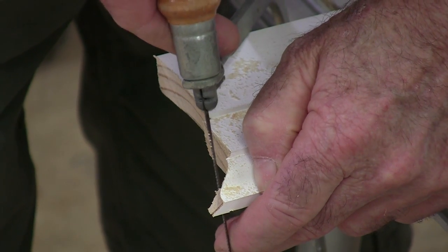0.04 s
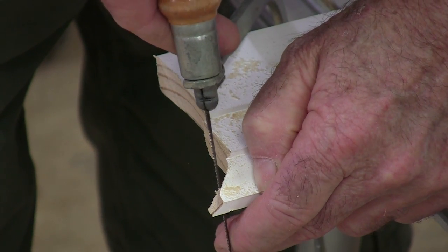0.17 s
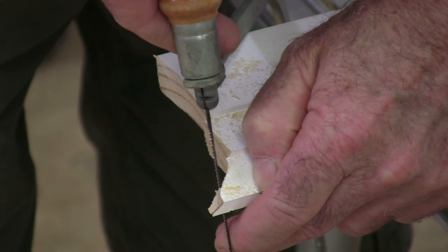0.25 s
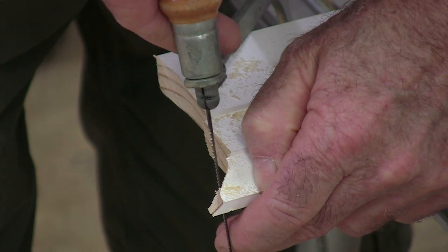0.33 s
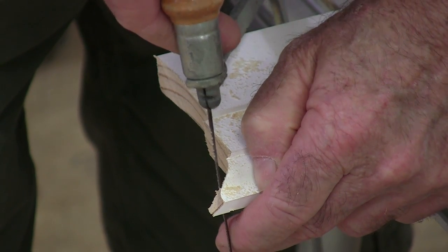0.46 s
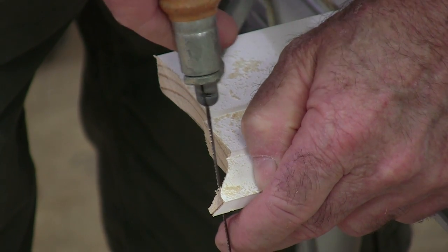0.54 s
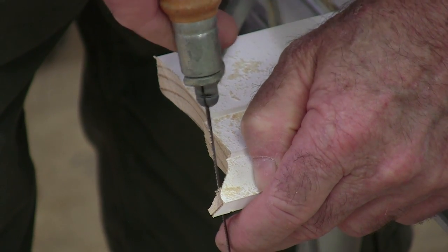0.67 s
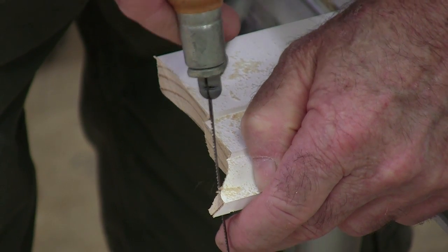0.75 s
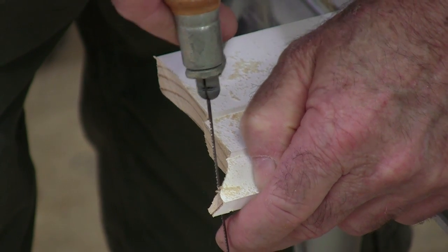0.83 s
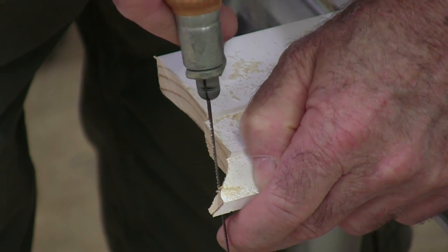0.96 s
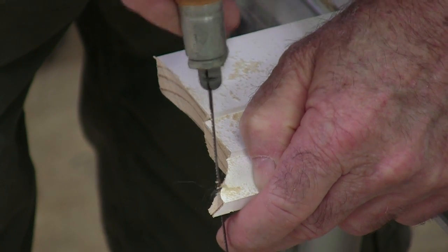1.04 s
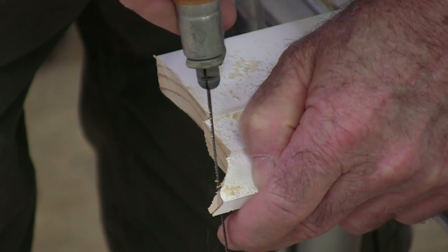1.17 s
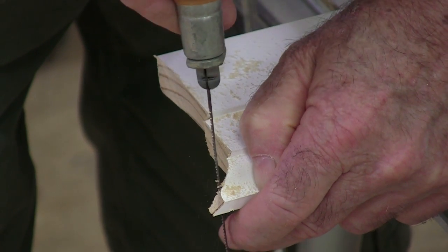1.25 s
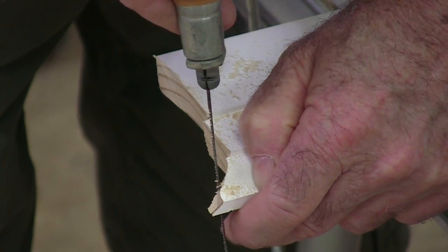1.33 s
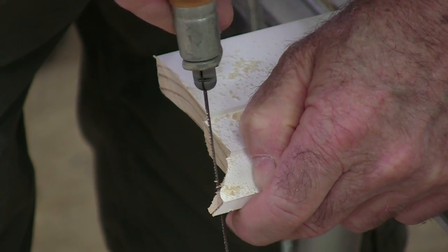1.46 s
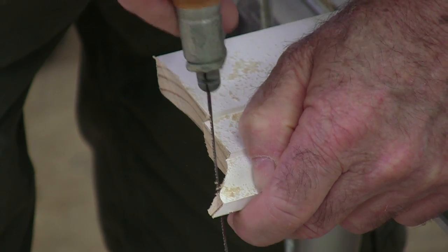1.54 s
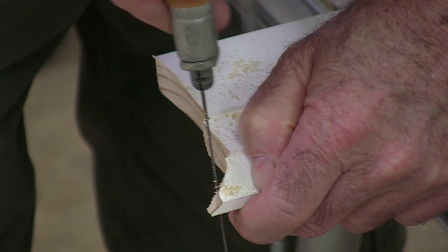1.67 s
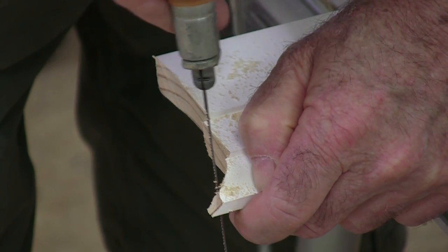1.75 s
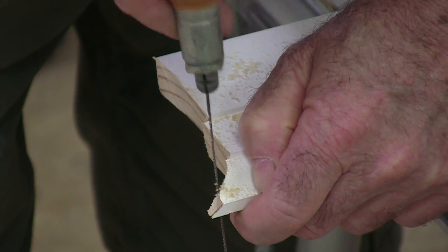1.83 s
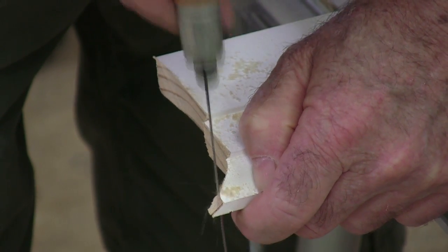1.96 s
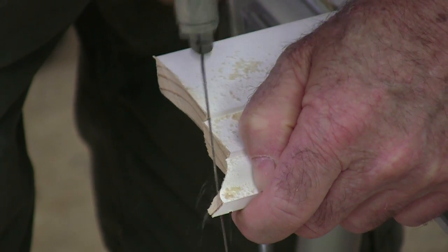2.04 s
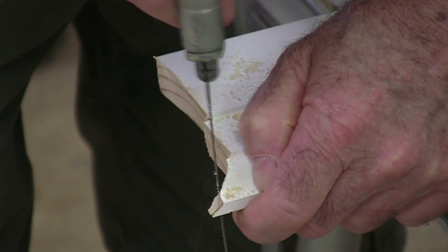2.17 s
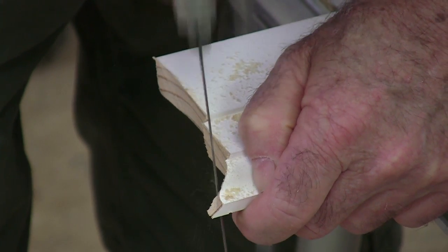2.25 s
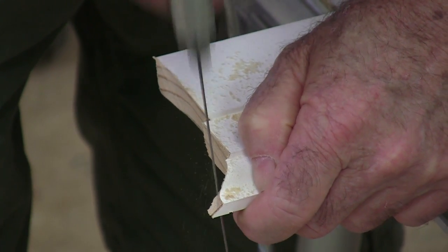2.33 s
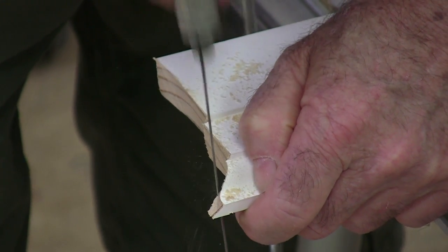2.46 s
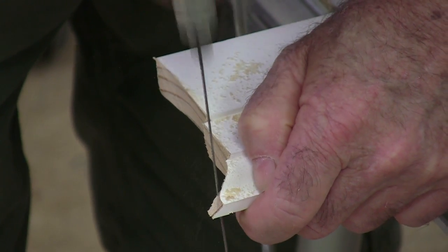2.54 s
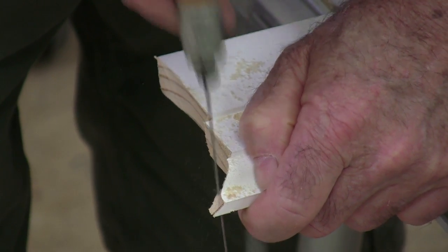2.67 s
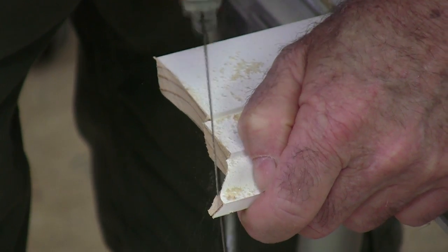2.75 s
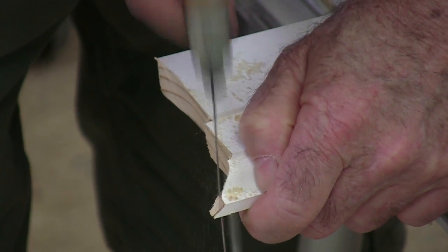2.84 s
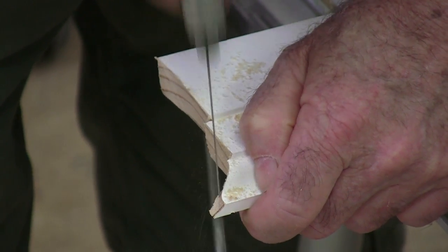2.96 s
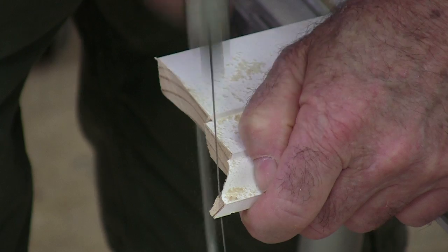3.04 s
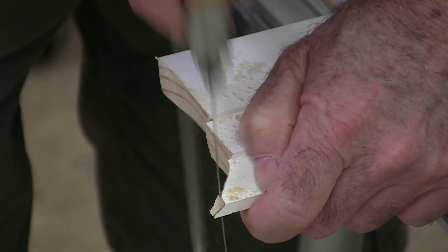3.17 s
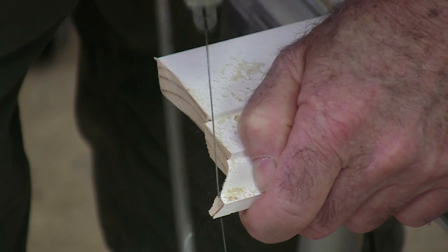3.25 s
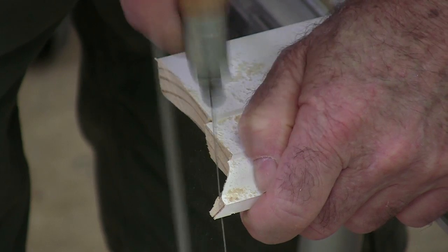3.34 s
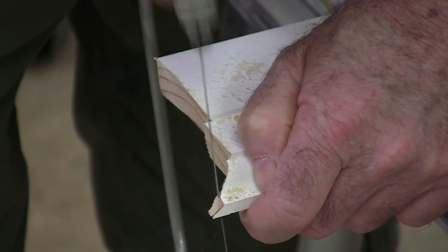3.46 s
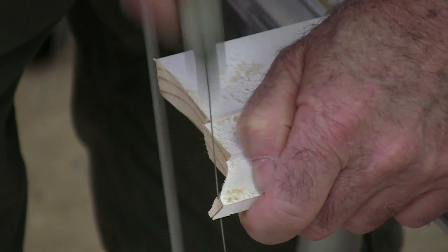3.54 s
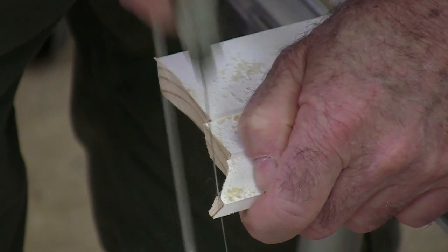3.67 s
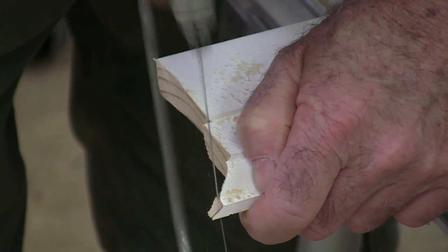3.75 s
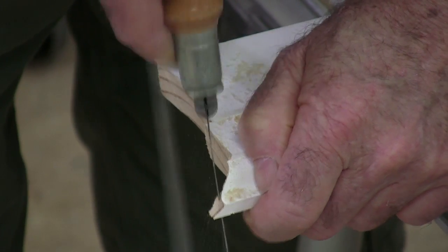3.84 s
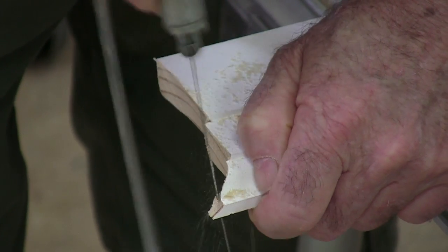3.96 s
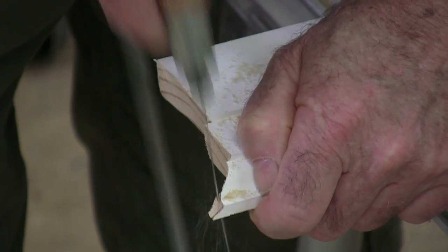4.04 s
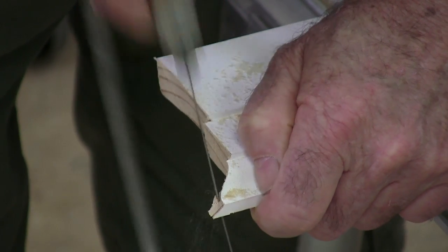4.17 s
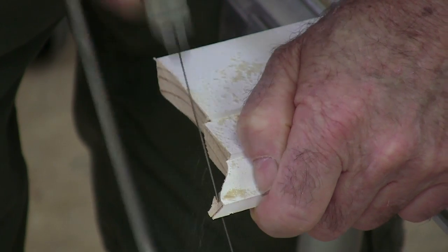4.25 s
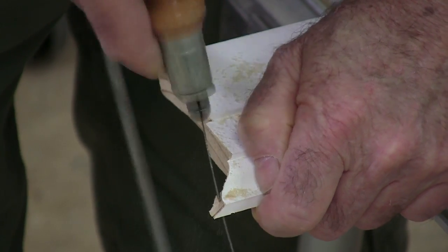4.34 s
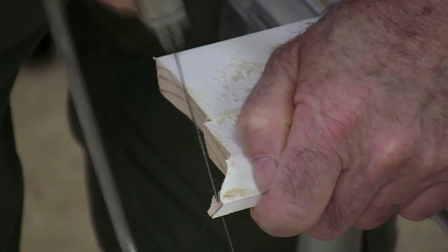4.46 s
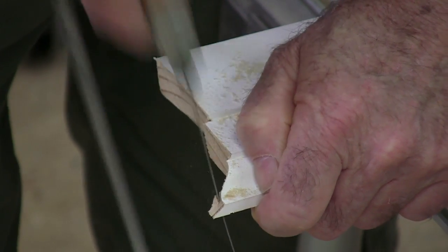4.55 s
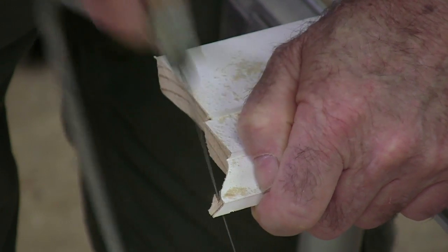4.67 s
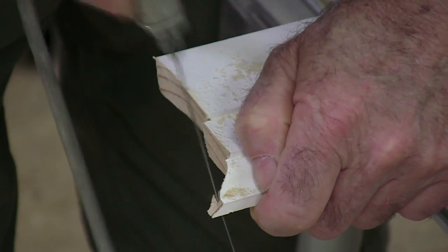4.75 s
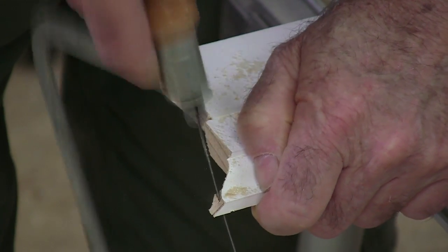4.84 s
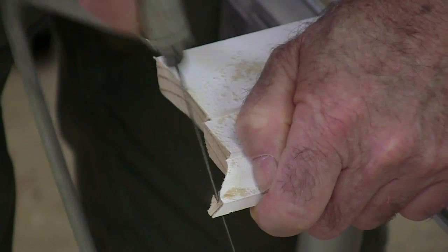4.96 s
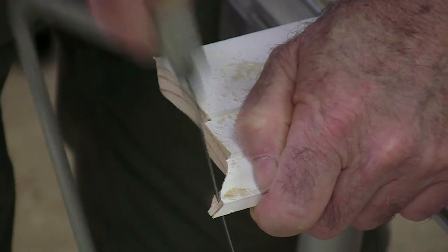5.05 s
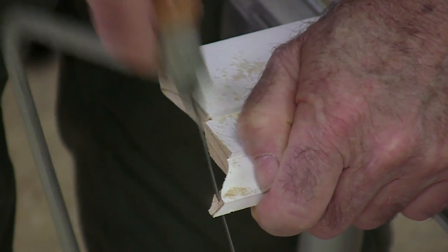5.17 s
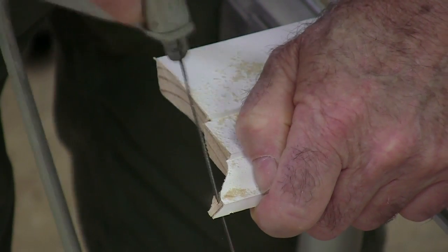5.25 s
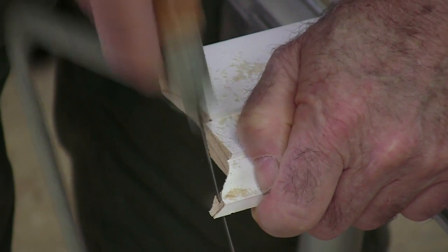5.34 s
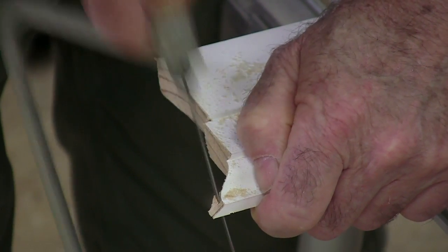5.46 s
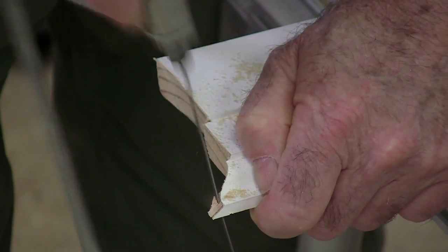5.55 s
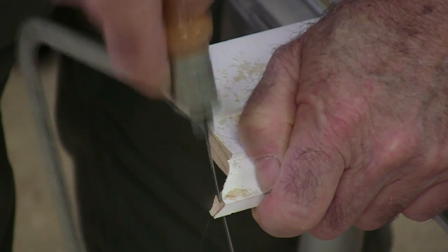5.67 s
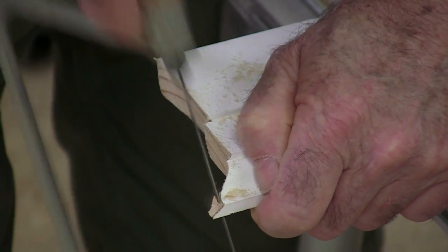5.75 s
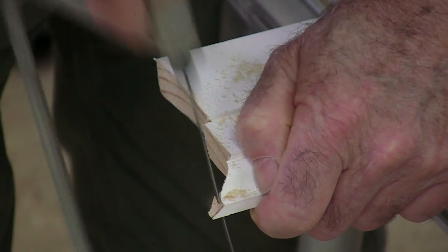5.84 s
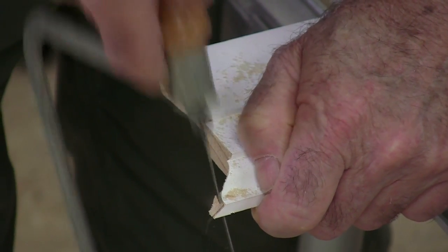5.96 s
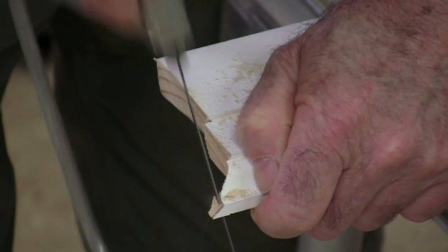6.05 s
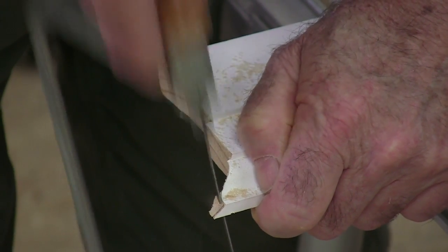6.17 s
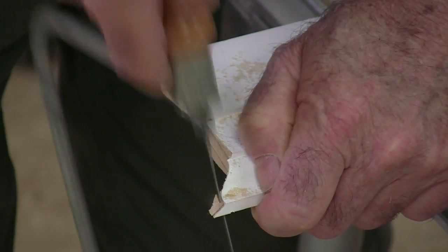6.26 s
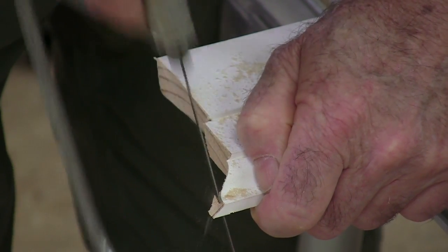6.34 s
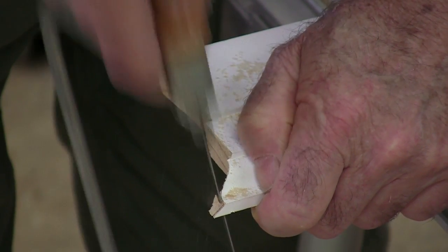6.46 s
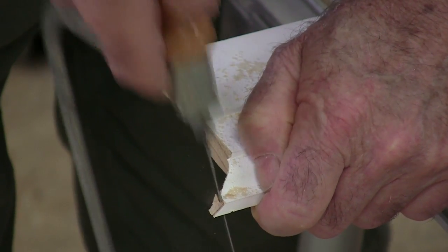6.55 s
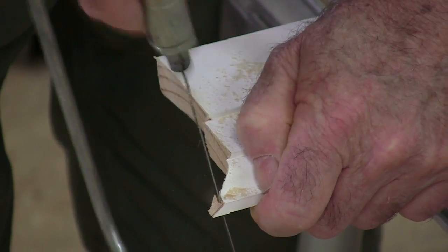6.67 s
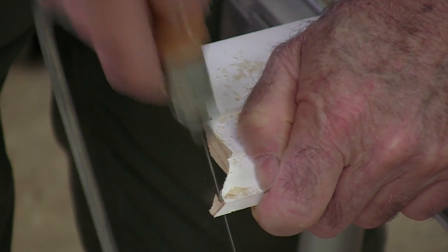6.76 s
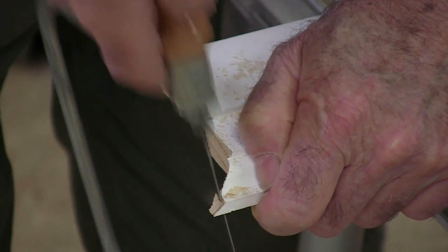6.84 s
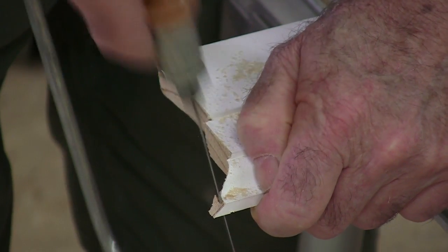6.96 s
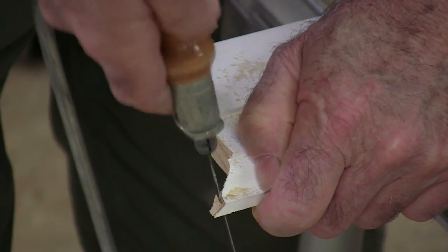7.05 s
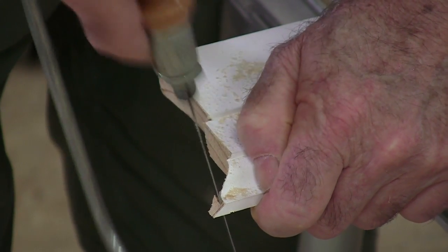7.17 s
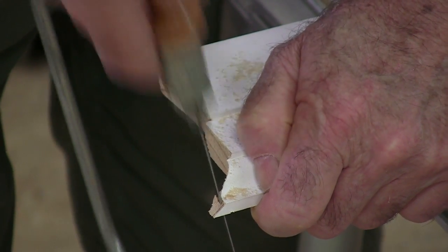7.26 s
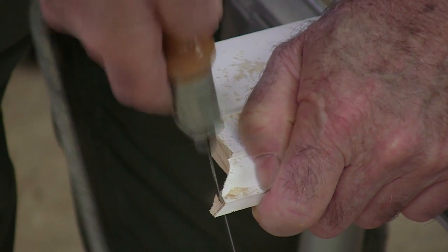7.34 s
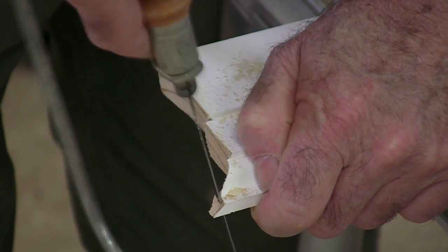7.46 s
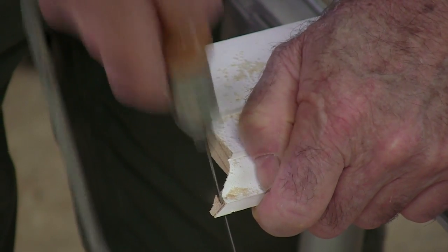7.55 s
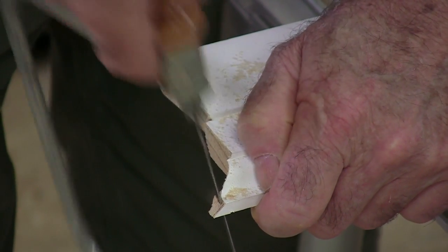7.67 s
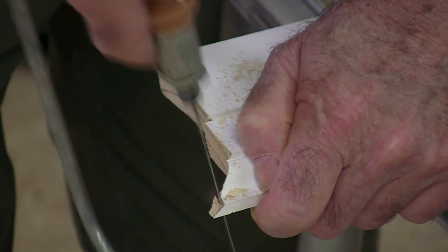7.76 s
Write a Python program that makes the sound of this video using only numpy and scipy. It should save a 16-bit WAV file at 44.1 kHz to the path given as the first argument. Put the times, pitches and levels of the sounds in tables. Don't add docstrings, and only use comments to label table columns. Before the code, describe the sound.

After a few light wooden taps, a hand coping saw rasps rapidly back and forth through a board, close up in a small workshop.

```python
import sys
import numpy as np
from scipy import signal
from scipy.fft import rfft, irfft, next_fast_len
from scipy.io import wavfile
from scipy.ndimage import uniform_filter1d, map_coordinates

SR = 44100
rng = np.random.default_rng(int(sys.argv[2]) if len(sys.argv) > 2 else 0)


def nominal_scale(level):
    x = np.asarray(level, float) / 20
    return 10 ** x


def output_pcm(signal):
    pcm = np.clip(np.atleast_2d(signal).T, -1, 1) * 32767
    wavfile.write(sys.argv[1], SR, np.round(pcm).astype(np.int16))


N = 344112

# time in seconds, peak in dB, thud of the bench in dB.
TAPS = [(0.568, -25, -14), (0.586, -30, -8), (0.593, -31, -8), (0.603, -31, -12), (0.771, -33, -6),
        (0.771, -23, -6), (0.776, -24, -10), (0.789, -16, -21), (0.793, -16, -20), (0.797, -19, -6),
        (0.81, -47, 4), (0.825, -45, 6), (1.084, -5.5, -11), (1.1, -11, -10), (1.115, -10.5, -13),
        (1.126, -34.5, 14)]
# frequency in Hz, width in Hz, level in dB in the shallow cut, level in dB in the deep cut.
BOARD = [(164, 68, -2.5, -10), (208, 59.4, -0.5, -8.5), (310.8, 21, -0.5, -1), (374, 29, -2.5, -4.5),
         (526, 60, -3, -4), (639.9, 10, -17, -25), (643.3, 27, -15, -26), (804, 42, -3, -2.5),
         (925, 54, -2, -3), (1085, 66, -3, -2), (1191, 71, -2, 2), (1243, 73, -4, 0.5),
         (1332, 76.8, -0.5, 2), (1426, 58, 2, -4.5), (1500, 69, -3.5, -12.5), (1670, 23, -6.5, -12),
         (1875, 48, -12, -9.5), (2176, 125, -19.5, -16.5), (2370, 94, -24, -24.5),
         (2756, 350, -35.5, -28.5), (3275, 135, -26, -21), (3550, 300, -29.5, -33.5),
         (4380, 290, -29, -25.5), (4740, 410, -34, -34)]
BENCH_HZ, FRAME_HZ = 640, 2600
# frequency in Hz, width in Hz, level in dB.
LEGS = [(134.6, 18, -1.5), (243.04, 30.5, -4.5)]
# time in seconds, depth 0-1, teeth per second at full speed, brightness in dB.
CUT = [
    (0, 0.2, 360, -3),
    (2, 0.1, 387, 0),
    (2.7, 0, 506, 1.5),
    (3.5, 0.3, 529, 1.5),
    (4.3, 0.28, 538, 1.5),
    (5, 0.66, 450, 4.5),
    (5.7, 0.85, 520, -2),
    (6.4, 0.97, 590, 0.5),
    (7.1, 0.95, 492, 1.5),
    (7.8, 1, 503, 3),
]
# start in seconds, bite in dB, bite at entry in dB, push into the bench in dB.
PULLS = [(2.019, -24.5, -29.5, 1.5), (2.28, -23, -26, -2.5), (2.49, -25, -23.5, -1),
         (2.733, -18, -24.5, -1), (2.978, -18.5, -23.5, -4), (3.218, -20, -25, -8),
         (3.458, -20.5, -23.5, -7), (3.698, -19.5, -26, -2), (3.952, -18.5, -17, 0.5),
         (4.198, -21, -20.5, -6), (4.454, -22, -27, -9.5), (4.7, -25.5, -24.5, -8), (4.955, -28, -26, -7),
         (5.214, -29, -27, -7), (5.479, -21, -24, -6), (5.751, -21, -20.5, -4), (6.026, -20, -20, -5.5),
         (6.318, -20, -18.5, -3.5), (6.603, -24, -21.5, -6.5), (6.888, -27.5, -25, -4.5),
         (7.159, -29.5, -23.5, -2), (7.426, -26.5, -22, -3.5), (7.691, -28.5, -23, -4)]
# start in seconds, bite in dB, bite at entry in dB, push into the bench in dB.
RETURNS = [(2.124, -31.5, -35, 1.5), (2.382, -24.5, -28.5, -7.5), (2.623, -22.5, -23.5, -2.5),
           (2.868, -19, -23, -6.5), (3.105, -20, -24.5, -6.5), (3.357, -19.5, -27, -10),
           (3.59, -19.5, -26.5, -6.5), (3.839, -20, -25, -5.5), (4.087, -21.5, -26.5, -1),
           (4.33, -23.5, -28, -5.5), (4.583, -24.5, -30.5, -8.5), (4.837, -26, -31.5, -7),
           (5.092, -26.5, -31.5, -6), (5.362, -25, -28, -5.5), (5.636, -21.5, -22.5, -8),
           (5.907, -23, -24.5, -5), (6.193, -20.5, -21.5, -9.5), (6.472, -22, -24, -6),
           (6.771, -25.5, -26.5, -2.5), (7.037, -24, -26, -4), (7.305, -27, -28, -1),
           (7.574, -25, -25, -1.5)]


def unit(x):
    return x / np.sqrt(np.mean(x ** 2) + 1e-20)


def along(points, hz):
    f, v = np.transpose(points)
    return np.interp(np.log(hz + 1), np.log(f + 1), v)


def curves(rows):
    s, *cols = np.transpose(rows)
    return [np.interp(np.arange(N) / SR, s, c) for c in cols]


def wobble(rate):
    knots = rng.standard_normal(int(N * rate / SR) + 4)
    return map_coordinates(knots, [np.arange(N) * rate / SR])


def filtered(x, response):
    m = next_fast_len(N + SR // 4, real=True)
    return irfft(rfft(x, m) * response(np.fft.rfftfreq(m, 1 / SR)), m)[..., :N]


def soft(x, corner_hz, order=1):
    return filtered(x, lambda hz: (1 + 1.2j * hz / corner_hz - (hz / corner_hz) ** 2) ** -order)


def ring(force, modes):
    def response(f):
        total = 0
        for k, (hz, width, db) in enumerate(modes):
            total = total + (-1) ** k * nominal_scale(db) * 1j * f * width / (hz * hz - f * f + 1j * f * width)
        return total
    return filtered(force, response)


def board(force, depth, low_hz, high_hz):
    drift = .007
    modes = [m for m in BOARD if low_hz < m[0] < high_hz]
    shallow = ring(force, [(hz * (1 + drift), w, db) for hz, w, db, _ in modes])
    deep = ring(force, [(hz * (1 - drift), w, db) for hz, w, _, db in modes])
    return (1 - depth) * shallow + depth * deep


def blows(times, sizes):
    return np.bincount(np.round(np.asarray(times) * SR).astype(int), sizes, N)[:N]


def stroke_plan():
    pull_turn_s, return_turn_s, last_turn_s = .033, .028, 7.83
    longest_pull_s, longest_return_s = .14, .1
    pull_exit_db, return_exit_db = -5, -5.5
    grip_db = 4
    # start in seconds, length in seconds, bite in dB, bite at entry in dB, push into the bench in dB.
    rubs = [
        (0.545, 0.062, -44, -50, 2),
        (0.768, 0.033, -31, -33, 4),
        (1.953, 0.049, -38.5, -47.5, -3),
    ]
    plan = [(s, length, entry, db, db + return_exit_db, push) for s, length, db, entry, push in rubs]
    for rows, others, turn_s, longest_s, exit_db in [
            (PULLS, RETURNS, pull_turn_s, longest_pull_s, pull_exit_db),
            (RETURNS, PULLS, return_turn_s, longest_return_s, return_exit_db)]:
        for s, db, entry, push in rows:
            following = min([row[0] for row in others if row[0] > s] + [last_turn_s])
            length = min(following - s - turn_s, longest_s)
            grip = grip_db * np.interp(s, *np.transpose(CUT)[:2])
            plan.append((s, length, entry, db, db + exit_db + grip, push))
    return plan


def strokes(rise_s, fall_s, drag_db):
    t = np.arange(N) / SR
    speed, bite, push = np.zeros(N), np.zeros(N), np.zeros(N)
    for s, length, entry_db, middle_db, exit_db, push_db in stroke_plan():
        span = slice(round((s - .03) * SR), round((s + length + 0.051) * SR))
        u = (t[span] - s) / length
        rise = np.exp(np.minimum(u, 0) * length / rise_s)
        fall = np.exp(np.minimum(1 - u, 0) * length / fall_s)
        levels_db = [entry_db + drag_db, entry_db, middle_db, exit_db, exit_db + drag_db]
        level = nominal_scale(np.interp(u, np.array([0, 1, 3, 5, 6]) / 6, levels_db)) * np.minimum(rise, fall)
        speed[span] = np.maximum(speed[span], np.sin(np.pi * np.clip((u + .25) / 1.5, 0, 1)))
        bite[span] += level
        push[span] += level * nominal_scale(push_db)
    return speed, bite, push


def floor():
    hiss_db, rest_db, shake_db, shake_s = -43.5, -53.5, -33, 0.053
    # frequency in Hz, density in dB per Hz.
    hiss_colour = [(12, -36), (20, -18), (70, 5.5), (343, -2.5), (566, -6.5), (651, -6), (1680, -9),
                   (2700, -9.5), (3560, -10.5), (5720, -11), (15600, -14.5)]
    rumble_colour = [(6, -24), (20, -6.5), (30, -6), (50, -12), (80, -17), (140, -50.0)]  # Hz, dB
    hiss = unit(filtered(rng.standard_normal(N), lambda hz: nominal_scale(along(hiss_colour, hz))))
    low = filtered(rng.standard_normal(N), lambda hz: nominal_scale(along(rumble_colour, hz)))
    rumble = unit(low * nominal_scale(1.4 * wobble(14)))
    push = strokes(rise_s=0.009, fall_s=.03, drag_db=-4)[2]
    shake = np.sqrt(np.abs(uniform_filter1d(push, size=round(shake_s * SR))))
    return nominal_scale(hiss_db) * hiss + (nominal_scale(rest_db) + nominal_scale(shake_db) * shake) * rumble


def taps():
    # time in seconds, peak in dB.
    pats = [(.124, -25), (.131, -32), (.139, -35), (.15, -37), (.822, -33), (.831, -35), (.778, -33),
            (.803, -29), (.812, -33), (1.093, -22), (1.107, -19), (1.128, -23), (1.148, -29)]
    # frequency in Hz, width in Hz, level in dB.
    patted = [(250, 91, -4), (367, 70, 3.5), (517.6, 80, 0), (900, 160, -8)]
    # frequency in Hz, width in Hz, level in dB.
    edge_modes = [(810, 140, -1.5), (1270, 480, -3.5), (1700, 220, 1.5), (2040, 110, -15), (3170, 350, -8),
                  (3900, 420, -17)]
    s, db, thud_db = np.transpose(TAPS)
    t = np.arange(SR // 10) / SR
    crack = (t == 0) + 0.035 * rng.standard_normal(len(t)) * nominal_scale(-60 * t / 0.026)
    rattle = (t == 0) + 0.02 * rng.standard_normal(len(t)) * nominal_scale(-60 * t / 0.065)
    knocks = signal.fftconvolve(blows(s, -nominal_scale(db + 25.5)), crack)[:N]
    edge = ring(soft(knocks, corner_hz=1880), edge_modes)
    bench = sorted([*LEGS] + [(hz, 1.56 * w, level) for hz, w, level, _ in BOARD if hz < BENCH_HZ])
    thud = ring(signal.fftconvolve(blows(s, nominal_scale(db + thud_db + 39.5)), rattle)[:N], bench)
    s, db = np.transpose(pats)
    return edge + thud + ring(soft(blows(s, nominal_scale(db + 35.5)), corner_hz=1100), patted)


def patchy(x, depth_db):
    z = signal.stft(x, nperseg=512)[2]
    field = uniform_filter1d(rng.standard_normal(z.shape), size=3, axis=0)
    field = uniform_filter1d(field, size=5, axis=1)
    return signal.istft(z * nominal_scale(depth_db * unit(field)), nperseg=512)[1][:N]


def steady(x):
    return x / np.sqrt(np.abs(uniform_filter1d(x ** 2, size=900)) + 1e-9)


def tooth_catches():
    first_tooth_s, pull_tooth_db, return_tooth_db = 0.00302, 7.5, 4
    # time in seconds, peak in dB.
    hard = [(2.023, -19), (2.042, -10), (2.061, -9), (2.31, -10), (2.519, -11), (2.642, -13), (2.772, -8),
            (2.788, -8), (2.879, -12), (2.991, -11), (3.841, -10), (3.885, -7), (3.892, -5), (3.903, -7),
            (3.955, -7), (3.968, -1), (3.785, -8), (4.126, -11), (4.227, -5), (4.73, -12), (4.957, -13),
            (5.396, -13), (5.482, -13), (6.206, -9), (6.494, -11), (7.055, -12), (7.212, -12), (7.326, -11),
            (7.577, -9), (7.634, -7), (2.762, -9), (3.128, -15), (3.245, -4), (3.402, -10), (3.749, -7),
            (3.723, -4), (4.21, -2.5), (4.342, -10), (4.481, -14), (4.53, -10), (5.569, -5), (6.15, -8),
            (6.44, -8), (4.971, -13), (5.658, -9), (5.759, -10), (5.802, -11), (6.03, -6), (6.33, -3),
            (6.625, -4), (6.677, -8), (6.726, -11), (6.912, -8), (6.978, -11), (7.182, -6), (7.243, -6.5),
            (7.367, -9), (7.431, -10), (7.502, -6), (7.595, -10), (7.766, -8)]
    openers = []
    for rows, tooth_db in [(PULLS, pull_tooth_db), (RETURNS, return_tooth_db)]:
        openers += [(s + first_tooth_s, entry + tooth_db) for s, _, entry, _ in rows]
    s, db = np.transpose([*hard] + openers)
    return blows(s + 0.00099, nominal_scale(db + 16))


def saw():
    flex = .17
    lowest_hz, legs_fade = 112, 0.59
    # frequency in Hz, width in Hz, level in dB.
    grit = [(880, 230, -9), (1260, 280, 1), (1850, 200, -15.5), (3200, 299, -16)]
    depth, rate, bright_db = curves(CUT)
    depth = np.clip(depth, 0, 1)
    speed, bite, push = strokes(rise_s=0.0043, fall_s=0.0053, drag_db=-5)

    passed = np.cumsum(rate * np.maximum(speed, .3) * nominal_scale(1.2 * wobble(40))) / SR
    times = np.flatnonzero(np.diff(np.floor(passed))) / SR
    chance = rng.standard_normal((N // 40, 3))[:len(times)]
    times = np.clip(times + .0003 * chance[:, 0], 0, None)
    teeth = steady(blows(times, nominal_scale(3.0 * chance[:, 1])))
    fibres = steady(rng.standard_normal(N) * nominal_scale(3.4 * wobble(300)))
    force = steady(patchy(teeth + 0.68 * fibres, depth_db=3.0))
    splinters = steady(blows(times, nominal_scale(2.3 * chance[:, 1]) * (chance[:, 2] > .85)))
    catches = tooth_catches()

    pressure = wobble(22)
    depth = np.clip(depth + flex * unit(uniform_filter1d(pressure, size=4000)), 0, 1)
    cutting = force * bite * nominal_scale(5.5 + 1.22 * pressure)
    face = board(cutting + soft(catches, corner_hz=1600), depth, BENCH_HZ, FRAME_HZ)
    rub = (fibres + 0.47 * force) * bite * nominal_scale(bright_db + 5.5 + 1.9 * (speed - 1) + 2 * wobble(25))
    frame = board(rub + .15 * catches, depth, FRAME_HZ, SR)
    bench = board(force * push * nominal_scale(21.5), depth, 0, BENCH_HZ)
    bench = bench + ring(force * push * nominal_scale(18.5) * (1 - legs_fade * depth), LEGS)
    bench = filtered(bench, lambda hz: (1 - 1.3j * lowest_hz / (hz + 1) - (lowest_hz / (hz + 1)) ** 2) ** -2.0)
    chips = ring(soft(splinters * bite * nominal_scale(8.5) + nominal_scale(8.0) * catches, corner_hz=1500), grit)
    return nominal_scale(10.5) * (face + frame) + bench + chips


def sway():
    level_db, t60_s = 27, 0.48
    # frequency in Hz, width in Hz, level in dB.
    hum_modes = [(45, 40, 2), (79, 50, 0), (141, 49, -3.5), (235, 56, -2), (380, 42, -5)]
    s, db, _ = np.transpose(TAPS)
    t = np.arange(SR // 2) / SR
    shaking = rng.standard_normal(len(t)) * nominal_scale(-60 * t / t60_s) * 0.033
    return ring(signal.fftconvolve(blows(s, nominal_scale(db + level_db)), shaking)[:N], hum_modes)


def jolts():
    # time in seconds, peak in dB, frequency in Hz.
    bites = [(0.785, -39, 152), (1.105, -24.5, 134), (1.199, -44, 135), (2.038, -22.5, 159.8),
             (2.17, -38, 215), (2.283, -43, 229.7), (6.55, -37, 135), (4.85, -39, 140), (2.749, -19, 149.5),
             (3.335, -37, 164), (3.474, -28.5, 220), (3.557, -38, 176), (3.701, -24, 164),
             (3.953, -20, 160.3), (3.975, -25, 190), (3.958, -25, 310), (4.1, -28, 150), (4.203, -28, 217),
             (4.315, -34, 147), (4.976, -32, 222.4), (5.146, -33.5, 145), (5.434, -32, 134.4),
             (5.669, -38, 154), (5.753, -38, 223.2), (6.037, -29, 149.6), (6.319, -26, 134.7),
             (6.338, -21.5, 215.4), (6.612, -28, 221.8), (7.179, -36, 179), (7.699, -28, 164.3)]
    out, t = np.zeros(N + SR), np.arange(SR // 4) / SR
    swell = (1 - np.exp(-t / 0.0072)) * nominal_scale(-60 * t / .2)
    for s, db, hz in bites:
        legs = 0.28 * np.sin(2 * np.pi * 0.79 * hz * t)
        out[round(s * SR):][:len(t)] += nominal_scale(db + 3.5) * swell * (np.sin(2 * np.pi * hz * t) + legs)
    return out[:N] * nominal_scale(3.4 * wobble(45))


def squeals():
    climb = .013
    # middle in seconds, length in seconds, frequency in Hz, level in dB.
    tones = [(2.318, 0.043, 310, -28.5), (2.675, .037, 1470, -32), (2.781, .055, 1115, -29),
             (2.798, .039, 810, -26), (2.916, .055, 312.5, -31), (3.037, .047, 501.8, -27),
             (3.039, 0.043, 1042, -26), (3.402, .077, 1423, -31.5), (3.643, .056, 1463, -29),
             (3.651, 0.04, 387, -29.5), (3.736, .046, 1435, -28), (3.765, .06, 375, -27),
             (3.8, .05, 290, -29), (4.52, .05, 320, -32), (4.37, .05, 540, -34), (5.83, .045, 1100, -27),
             (7.19, .03, 1000, -27), (7.63, .04, 1300, -28), (3.745, .04, 800, -29),
             (4.145, 0.044, 796, -25), (4.235, .038, 496, -28.5), (4.254, .061, 297, -28),
             (5.811, 0.069, 546, -31), (6.101, 0.039, 1275, -21), (6.113, 0.041, 931, -29),
             (6.262, .038, 792, -26), (6.384, 0.053, 1306, -24.5), (6.383, .059, 808, -27.5),
             (6.545, .041, 821.4, -21), (7.504, .032, 1340, -32)]
    out, unsteady = np.zeros(N + SR), nominal_scale(1.2 * wobble(60))
    for s, length, hz, db in tones:
        u = np.linspace(0, 1, round(1.22 * length * SR))
        turns = np.cumsum(hz * (1 + climb * (u - .5))) / SR
        tone = nominal_scale(db + 4) * np.sin(np.pi * u) * np.sin(2 * np.pi * turns)
        out[round((s - .7 * length) * SR):][:len(u)] += tone
    return out[:N] * unsteady


def scrapes():
    # time in seconds, peak in dB.
    flecks = [(2.7796, -34), (3.4101, -42), (3.8107, -41), (3.9659, -34), (4.2079, -43), (4.996, -38),
              (5.1184, -38), (5.7583, -43), (6.3599, -42), (7.0718, -43), (7.2354, -37), (7.4689, -45),
              (7.5806, -41), (7.6964, -41)]
    s, db = np.transpose(flecks)
    t = np.arange(SR // 20) / SR
    fade = signal.fftconvolve(blows(s, nominal_scale(db + 1.5)), nominal_scale(-60 * t / .06))[:N]
    return ring(fade * rng.standard_normal(N), [(5300, 500, 2.7), (6100, 700, 3.2)])


def shop(x):
    # frequency in Hz, T60 in seconds.
    decay = [(100, 0.92), (300, 1), (800, 0.62), (1500, 0.26), (2500, 1), (5000, 0.2)]
    hz, t, z = signal.stft(rng.standard_normal((3, SR)), SR, nperseg=256)
    tails = signal.istft(z * nominal_scale(-60 * t / along(decay, hz)[:, None]), SR, nperseg=256)[1]
    share = np.cos(np.pi * (np.arange(N) / SR + np.arange(3)[:, None] / 3)) ** 2 / 1.5
    wet = signal.fftconvolve(x * share, tails / np.linalg.norm(tails[0]), axes=1).sum(0)
    return np.pad(wet, (600, 0))[:N]


def scene():
    wood = saw() + taps() + squeals() + jolts() + sway()
    wood = soft(wood, corner_hz=5200, order=2)
    return (wood + nominal_scale(-11.5) * shop(wood) + scrapes() + floor())[None]


def low_pass(x):
    return signal.sosfilt(signal.butter(12, 15750, fs=SR, output="sos"), x)


def record(dry):
    # time in seconds, gain in dB.
    ducks = [
        (2.775, -3),
        (3.755, -1.5),
        (3.96, -8),
        (4.225, -2),
        (6.38, -2),
    ]
    t = np.arange(N) / SR
    duck_db = np.zeros(N)
    for s, db in ducks:
        recovery_db = np.minimum(db + 36 * np.maximum(t - s - .02, 0), 0)
        duck_db += recovery_db * np.clip((t - s) / 0.0067, 0, 1)
    x = dry * nominal_scale(duck_db)
    x = x / (1 + np.abs(x / .37) ** 7) ** (1 / 7)
    return low_pass(x)


dry = scene()
out = record(dry)
output_pcm(out)
```